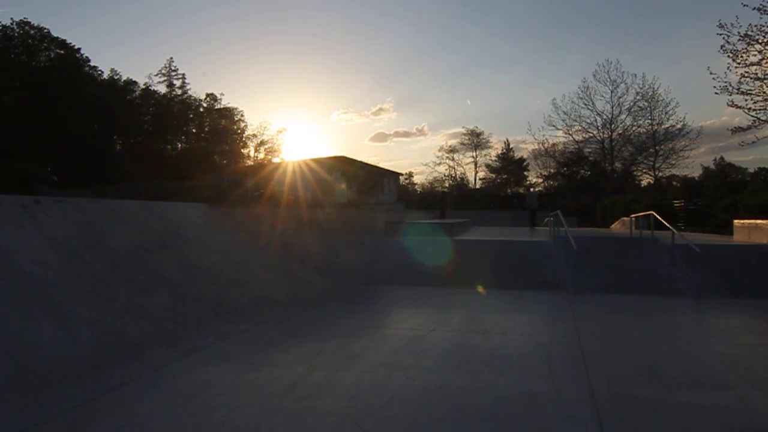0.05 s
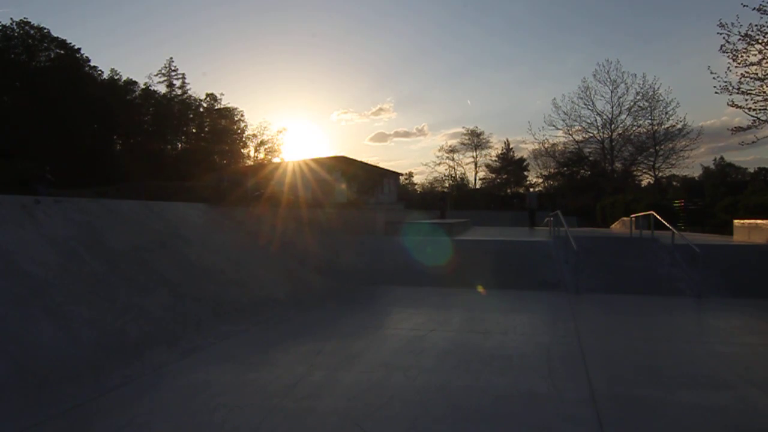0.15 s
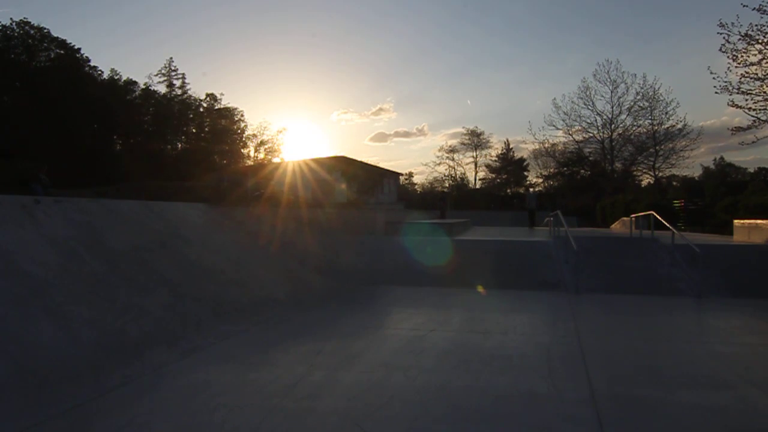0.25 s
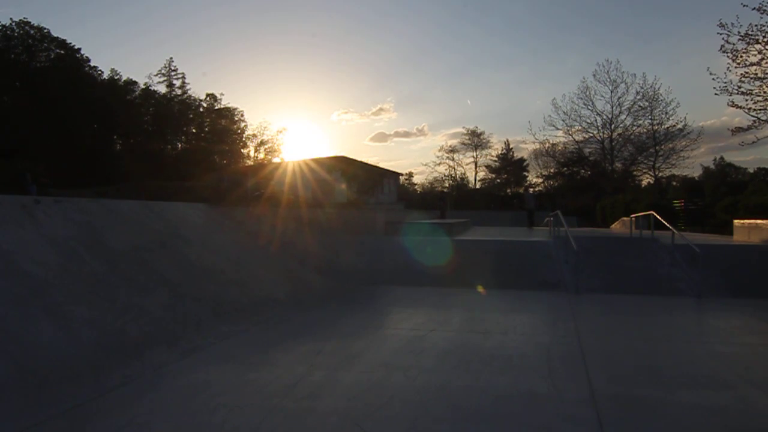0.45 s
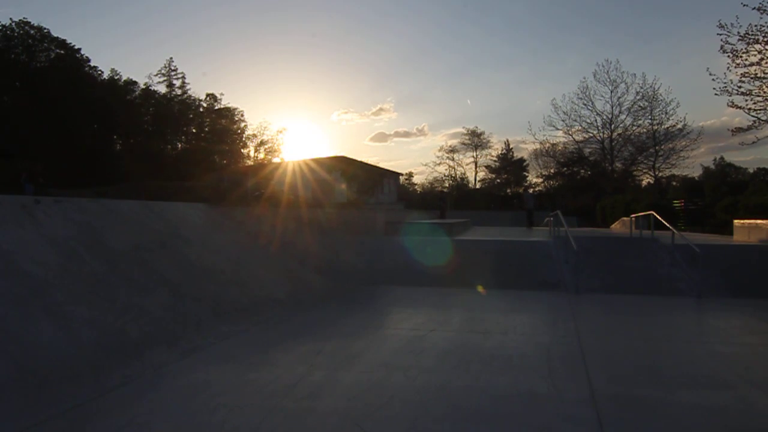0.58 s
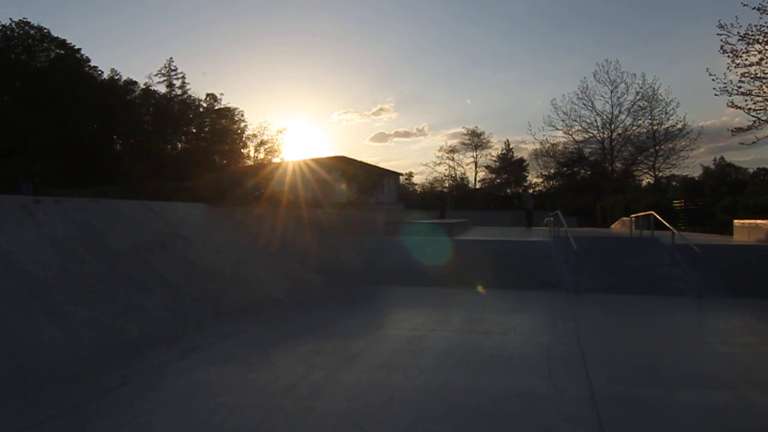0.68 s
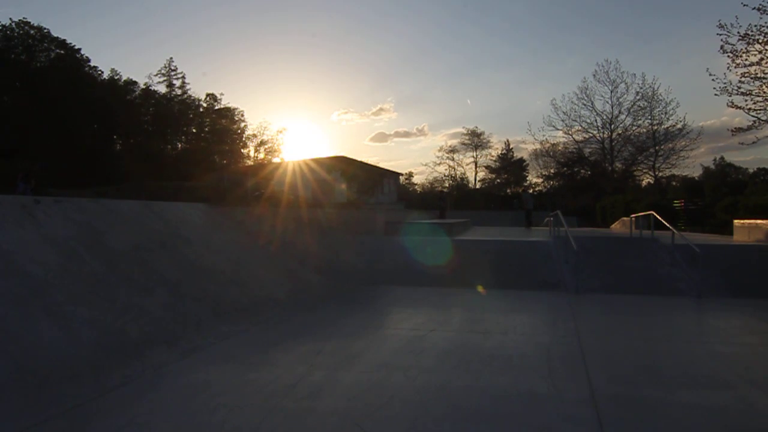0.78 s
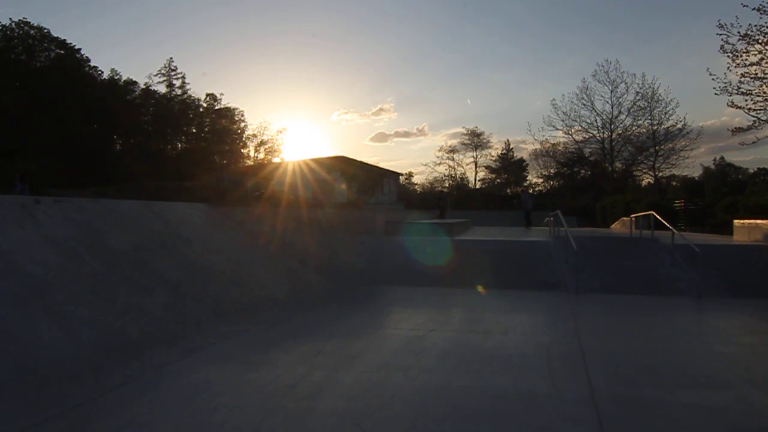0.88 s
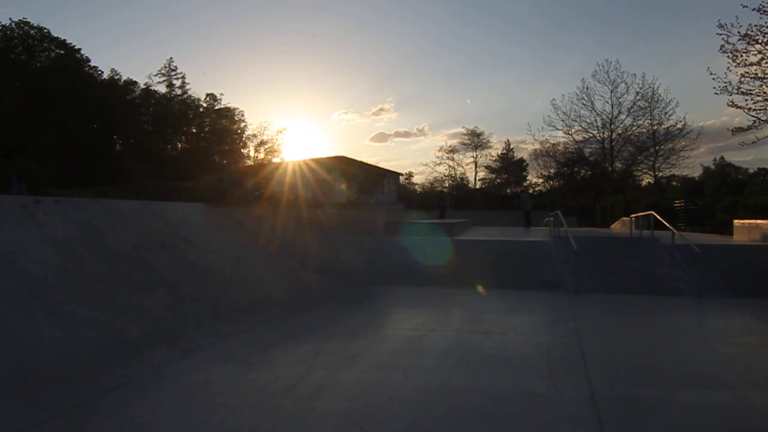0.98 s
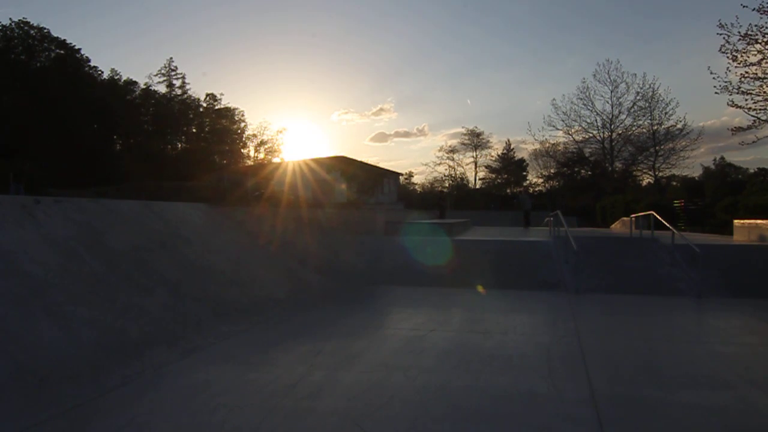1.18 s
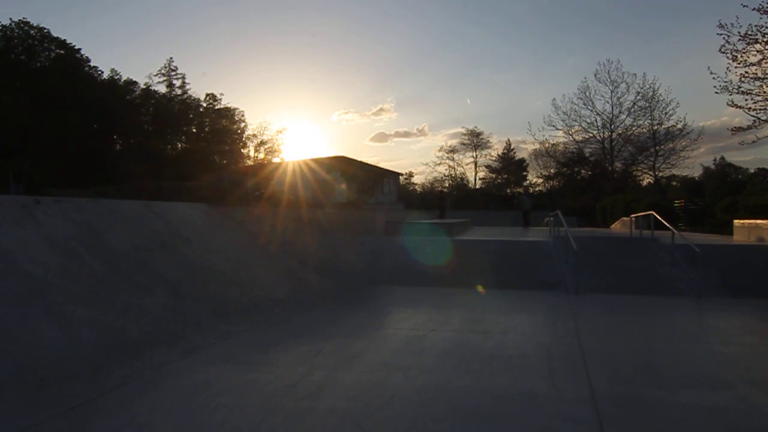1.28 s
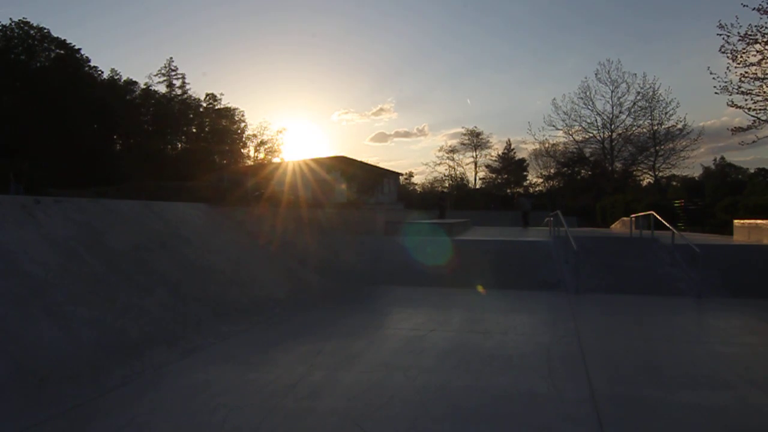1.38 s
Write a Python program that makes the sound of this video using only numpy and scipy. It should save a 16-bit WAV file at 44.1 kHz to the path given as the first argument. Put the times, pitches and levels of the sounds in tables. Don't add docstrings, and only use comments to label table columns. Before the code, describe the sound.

A skateboard lands with a hard clattering crack on concrete, wheels squealing before and after

```python
import sys
import numpy as np
from scipy import signal
from scipy.io import wavfile

SR = 44100
rng = np.random.default_rng(int(sys.argv[2]) if len(sys.argv) > 2 else 0)


def materialize(psi):
    bounded = np.clip(np.atleast_2d(psi).T, -1, 1)
    quanta = np.round(bounded * 32767).astype(np.int16)
    wavfile.write(sys.argv[1], SR, quanta)


def attenuation_scalar(level_db):
    decades = np.asarray(level_db, float) / 20
    return 10 ** decades


N = 63945
TIME = np.arange(N) / SR


def rms_one(x):
    return x / np.sqrt(np.mean(x ** 2) + 1e-20)


def drift(rate_hz):
    r = np.exp(-2 * np.pi * rate_hz / SR)
    settled = signal.lfilter([1], [1, -2 * r, r * r], rng.standard_normal(N + SR))[SR:]
    return rms_one(settled)


def resonate(x, hz, width_hz):
    r = np.exp(-np.pi * width_hz / SR)
    zeros = [(1 - r * r) / 2, 0, (r * r - 1) / 2]
    poles = [1, -2 * r * np.cos(2 * np.pi * hz / SR), r * r]
    return signal.lfilter(zeros, poles, x + 1e-18)


def filtered(x, order, hz, kind="low"):
    return signal.sosfilt(signal.butter(order, hz, kind, fs=SR, output="sos"), x)


def arch(start_s, length_s):
    return np.sin(np.pi * np.clip((TIME - start_s) / length_s, 0, 1))


def banded_noise(spectrum, patchy_db):
    out, together = 0, drift(3)
    edges = 22 * 2 ** np.arange(0, 9.7, 1 / 3)
    white = rng.standard_normal((2, N))
    hz, db = np.transpose(spectrum)
    for k, (low, high) in enumerate(zip(edges, edges[1:])):
        band = filtered(white[k % 2], 2, [low, high], "band")
        level_db = np.interp(np.log(low * high) / 2, np.log(hz), db)
        flicker_db = patchy_db * (.4 * together + drift(11.5))
        out = out + band * attenuation_scalar(level_db + flicker_db)
    return rms_one(out)


# (frequency [Hz], level per Hz [dB])
TRAFFIC_SPECTRUM = [(25, 9.5), (70, -1), (105, -2), (220, -2.5), (420, -6), (1020, -3), (3080, -18.5),
                    (16000, -33.5)]
# (frequency [Hz], width [Hz], level [dB])
TRAFFIC_HUMPS = [(102.3, 18, -41), (158.4, 15, -49), (962, 210, -43), (1584, 194, -46.5)]
# (time [s], level [dB])
TRAFFIC_SWELL = [(0, 1.5), (.15, 0.5), (.28, 0), (.4, 1.8), (.5, 0.3), (.7, -1), (.9, -0.8), (1.1, 0.45),
                 (1.3, -1.5), (1.45, -0.5)]


def traffic():
    humps = 0
    for hz, width_hz, db in TRAFFIC_HUMPS:
        humps = humps + attenuation_scalar(db) * rms_one(resonate(rng.standard_normal(N), hz, width_hz))
    wash = attenuation_scalar(-34.5) * banded_noise(TRAFFIC_SPECTRUM, patchy_db=1.85)
    return attenuation_scalar(np.interp(TIME, *np.transpose(TRAFFIC_SWELL))) * (wash + humps)


def bowl(x):
    tail_db, t60_s, cut_hz, first_return_s = -13, 0.28, 9500, .004
    t = np.arange(SR // 2) / SR
    tail = rng.standard_normal(len(t)) * attenuation_scalar(-60 * t / t60_s) * (t > first_return_s)
    tail = filtered(tail, 1, cut_hz)
    return attenuation_scalar(tail_db) * signal.fftconvolve(x, tail / np.sqrt(np.sum(tail ** 2)))[:N]


def grit():
    grains_per_s, level_db = 110, -3
    born = rng.random(N) < grains_per_s / SR
    dealt = rng.integers(0, 12, N)
    ping = np.hanning(SR // 150)
    out = np.zeros(N)
    for k, hz in enumerate(np.geomspace(4700, 8600, 12)):
        out += np.convolve(born * (dealt == k), ping)[:N] * np.sin(2 * np.pi * hz * TIME)
    return attenuation_scalar(level_db) * out


# (frequency [Hz], level per Hz [dB])
SCRUB_SPECTRUM = [(1500, -8), (3000, -6.5), (4500, 5.5), (6000, 4), (8500, -3), (11500, -3), (15000, -1),
                  (16500, -35)]
# (time [s], level [dB])
SCRUB_LEVEL = [(.26, -72.5), (.31, -45), (.38, -54), (.42, -65), (.45, -78), (.66, -56), (.8, -50),
               (.9, -44), (1.01, -41.5), (1.12, -45.5), (1.2, -46.5), (1.29, -49), (1.33, -62), (1.4, -58),
               (1.45, -58)]


def scrub():
    bounce_s, bounce_share = .0006, .5
    hiss = banded_noise(SCRUB_SPECTRUM, patchy_db=1.2)
    hiss = hiss + bounce_share * np.roll(hiss, int(bounce_s * SR))
    return attenuation_scalar(np.interp(TIME, *np.transpose(SCRUB_LEVEL))) * (hiss + grit())


# (time [s], squeal pitch [Hz], squeal level [dB])
SIDE_LOAD = [
    [(.22, 4045, -48.5), (.29, 4103, -46), (.31, 4075, -43), (.40, 4150, -42), (.44, 4170, -45),
     (.49, 4150, -52), (.5, 4092, -66)],
    [(.72, 4210, -62), (.755, 4275, -46.5), (.82, 4180, -50), (.9, 4060, -39), (.95, 3910, -39),
     (1.05, 3940, -45), (1.09, 3960, -36.5), (1.17, 3830, -43.5), (1.25, 4230, -43), (1.32, 4260, -50),
     (1.38, 4101, -82)],
]


def squeal():
    width_hz, octave_db = 210, -12.5
    s, hz, db = np.transpose(SIDE_LOAD[0] + SIDE_LOAD[1])
    phase = 2 * np.pi * np.cumsum(np.interp(TIME, s, hz)) / SR
    rough = drift(width_hz) * np.cos(phase) + drift(width_hz) * np.sin(phase)
    octave = drift(width_hz) * np.cos(2 * phase) * attenuation_scalar(octave_db)
    level_db = np.interp(TIME, s, db, left=-90) + 1.8 * drift(44)
    return (rough + octave) * attenuation_scalar(level_db)


# (time [s], length [s], pitch [Hz], level [dB])
CHIRP_EVENTS = [(.330, .0044, 4010, -25), (.354, .0064, 4150, -23), (.360, .010, 4080, -23),
                (.370, .007, 4085, -28), (.3775, .0032, 3950, -21), (.383, .0032, 3950, -22),
                (.3865, .0045, 4000, -23), (.396, .010, 4220, -25), (.419, .022, 4180, -32),
                (.472, .02, 4170, -38), (.446, .024, 4220, -39), (.401, .018, 4190, -19),
                (.838, .016, 4040, -36), (.932, .01, 3480, -33), (.924, .014, 3930, -30),
                (.938, .014, 4000, -31), (.996, .012, 3810, -31), (1.069, .016, 3960, -31),
                (1.088, .014, 3950, -33), (1.108, .012, 3070, -31), (.703, .022, 7110, -43),
                (.718, .028, 7410, -45), (1.346, .013, 7260, -43), (1.093, .012, 5850, -41),
                (1.296, .012, 5600, -44), (.325, .012, 8200, -42), (.355, .022, 8250, -40),
                (.392, .012, 8500, -43)]


def chirps():
    wobble_share, flutter_db, overtone_db = .006, 1.0, -37
    out, wobble, flutter = np.zeros(N), drift(158.0), drift(120.0)
    for s, length_s, hz, db in CHIRP_EVENTS:
        phase = 2 * np.pi * hz * np.cumsum(1 + wobble_share * wobble) / SR
        tone = np.sin(phase) + attenuation_scalar(overtone_db) * np.sin(2 * phase)
        out += attenuation_scalar(db + flutter_db * flutter) * arch(s, length_s) * tone
    return out


# (time [s], length [s], pitch [Hz], level [dB])
SLIP_EVENTS = [(.298, .03, 4090, -38), (.375, .02, 3760, -38), (.405, .015, 3510, -42),
               (.75, .07, 4290, -45), (.88, .018, 4130, -35), (.903, .014, 4060, -35),
               (.91, .05, 3490, -41), (.96, .035, 3810, -40), (1.005, .03, 4110, -41),
               (1.078, .04, 3010, -43), (1.11, .03, 3860, -39), (1.145, .05, 3760, -40),
               (1.165, .025, 3460, -42), (.812, .02, 5350, -46), (.84, .035, 5250, -47),
               (.95, .04, 8600, -51), (.99, .05, 5200, -48), (1.0, .04, 6000, -50), (1.105, .03, 7300, -50),
               (1.225, .03, 6050, -49), (.405, .025, 5800, -48)]


def slips():
    width_hz = 170
    a, b = drift(width_hz), drift(width_hz)
    out = np.zeros(N)
    for s, length_s, hz, db in SLIP_EVENTS:
        phase = 2 * np.pi * hz * TIME
        rough = a * np.cos(phase) + b * np.sin(phase)
        out += attenuation_scalar(db) * np.sqrt(arch(s, length_s) + 1e-12) * rough
    return out


# (time [s], length [s], level [dB])
SCRAPE_EVENTS = [
    (.245, .018, -33),
    (.268, .006, -34),
    (.298, .016, -35),
    (.318, .02, -38),
    (.907, .012, -36),
    (.508, .03, -30),
    (.54, .025, -25),
    (.565, .03, -33),
    (.595, .07, -41),
]


def scrapes():
    rasp = rng.standard_normal(N) * attenuation_scalar(2 * drift(250))
    rasp = rms_one(filtered(rasp, 4, [590, 3250], "band"))
    return rasp * sum(attenuation_scalar(db) * np.sqrt(arch(s, length_s) + 1e-12) for s, length_s, db in SCRAPE_EVENTS)


# (time [s], peak level [dB], frequency [Hz], t60 [s])
KNOCK_EVENTS = [(.2450, -15, 1600, .012), (.2537, -12.5, 1835, .009), (.247, -26, 740, .044),
                (.2455, -29, 2700, .018), (.2565, -28, 2900, .02), (.2695, -26, 1780, .015),
                (.285, -23, 1870, .02), (.299, -30, 780, .03), (.3235, -20.5, 1550, .016),
                (.9075, -19, 963, .04), (.908, -30, 2058, .025), (.596, -24, 1220, .026),
                (.917, -29, 330, .1), (1.074, -17, 62, .12), (1.16, -29, 873, .05), (.21, -33, 385, .45),
                (1.0, -35, 153, 3), (.568, -24, 700, .03), (.583, -24, 580, .04)]


def knocks():
    out, noise = np.zeros(N), rng.standard_normal(N)
    for s, db, hz, t60_s in KNOCK_EVENTS:
        age = np.maximum(TIME - s, 0)
        width_hz = 0.76 * hz
        puff = rms_one(resonate(resonate(noise, hz, width_hz), hz, width_hz))
        envelope = attenuation_scalar(db - 60 * age / t60_s) * (1 - np.exp(-2.5 * age * hz))
        out += envelope * (np.sin(2 * np.pi * hz * age) + 0.41 * puff)
    return filtered(out, 2, 3500)


# (time [s], level [dB], contact [s])
THUMP_EVENTS = [(0.509, -18, .002), (0.5226, -20, .002), (.5281, -10.5, .0026), (0.5336, -12.5, 0.0043),
                (0.5397, -14, 0.0022), (.5445, -10, 0.0017), (.5457, -3, 0.0016), (0.5491, -17.5, 0.001),
                (0.5542, -7, 0.0013), (0.56, -17, 0.0023), (0.5674, -15.5, .0015), (0.5698, -27, 0.0019),
                (0.587, -23, 0.0018), (0.907, -20, 0.0029)]
# (frequency [Hz], level [dB], t60 [s])
DECK_MODES = [(145, -18.5, 0.16), (338, -12.5, 0.034), (425, -9.5, 0.029), (554, -25, .02),
              (720, -12, 0.022), (1110, -16, 0.016)]


def thumps():
    rebound_s = .545
    push = np.zeros(N)
    for s, db, contact_s in THUMP_EVENTS:
        push += np.sign(s - rebound_s) * attenuation_scalar(db) * arch(s, contact_s) ** 2
    body = 0
    for hz, db, t60_s in DECK_MODES:
        body = body + attenuation_scalar(db + 7.5) * resonate(push, hz, np.log(1000) / np.pi / t60_s)
    return filtered(0.91 * push + body, 1, 60, "high")


def strikes(rows, rings):
    rise_s, spread_db, treble_dies_faster = .0003, 1.5, 0.11
    out, noise = np.zeros(N), rng.choice([-1., 1.], N)
    spread = rng.standard_normal((len(rows), len(rings)))
    for k, (hz, width_hz, ring_db) in enumerate(rings):
        octaves = np.log2(hz / 4000)
        for (s, db, decay_s, bright_db), own in zip(rows, spread[:, k]):
            i = slice(int(s * SR), int(s * SR) + SR // 10)
            age = TIME[i] - TIME[i][0]
            fall = np.exp(-age / decay_s * (hz / 4000) ** treble_dies_faster)
            burst = noise[i] * (1 - np.exp(-age / rise_s)) * fall
            level_db = db + ring_db + 6.0 + bright_db * octaves + spread_db * own
            out[i] += (-1) ** k * attenuation_scalar(level_db) * resonate(burst, hz, width_hz)
    return out


TICK_UNEVENNESS = [-3, 1, -5, 2, 3, 1, 1, -1]
# (frequency [Hz], width [Hz], level [dB])
LOOSE_PART_RINGS = [(3000, 1200, -8), (4300, 1200, -1), (5800, 1500, 0), (7600, 2000, -5),
                    (9500, 2500, -13), (13000, 3000, -19)]


def rattle():
    first_s, period_s, decay_s = .5641, .01578, .0011
    level_db, loss_db, bright_db, dulling_db = -11, 1.5, 1, .9
    ticks = []
    for k, uneven_db in enumerate(TICK_UNEVENNESS):
        tick_db = level_db - k * loss_db + uneven_db
        ticks.append((first_s + k * period_s, tick_db, decay_s, bright_db - k * dulling_db))
    return filtered(strikes(ticks, LOOSE_PART_RINGS), 2, 2400, "high")


# (time [s], peak level [dB], decay [s], brightness [dB per octave])
CRACK_EVENTS = [(.5043, -44, 0.00052, 1), (.5108, -13, 0.0024, -1), (.5138, -21.5, 0.0021, -7.5),
                (.5207, -22, 0.0022, 7), (.5235, -35, 0.0027, -11), (.5295, -26.5, 0.015, -1),
                (.5400, -2, 0.002, -1), (.5485, -12.5, 0.0013, 3.5), (.5501, -3.5, 0.0013, 0.5),
                (.5545, -21, 0.0017, 6), (.5590, -22, 0.0012, 2), (.5693, -13, 0.0025, -4),
                (.5715, -16, 0.0011, 4), (.576, -20, 0.002, 6), (.5803, -12, .001, -5),
                (.588, -54, .003, 7)]
# (frequency [Hz], width [Hz], level [dB])
DECK_AXLE_RINGS = [(750, 630, -5), (1110, 690, -2), (1460, 770, -2), (2360, 1100, 0), (3050, 940, -5.5),
                   (3750, 560, 2), (5450, 1800, -3), (6980, 1430, -6.5), (9900, 1000, -12.5),
                   (11800, 1100, -8.5), (14900, 1600, -16)]


def cracks():
    return strikes(CRACK_EVENTS, DECK_AXLE_RINGS)


def scene():
    board = cracks() + rattle() + thumps() + knocks()
    wash = traffic() + bowl(board) + scrub() + squeal() + chirps() + slips() + scrapes()
    wash = signal.sosfilt(signal.cheby2(12, 45, 16000, fs=SR, output="sos"), wash)
    return (board + wash)[None]


def band_limit(x):
    return signal.sosfilt(signal.butter(12, 16680, fs=SR, output="sos"), x)


def record(dry):
    duck_s, duck_db, attack_s, release_s, overload = 0.5504, -5.5, 0.013, 0.34, .85
    age = np.maximum(TIME - duck_s, 0)
    recovery = np.clip(1 - age / release_s / 2, 0, 1)
    gain = attenuation_scalar(duck_db * (1 - np.exp(-age / attack_s)) * recovery)
    limited = overload * np.tanh(dry * gain / overload)
    mix = signal.sosfilt(signal.cheby2(10, 50, 16900, fs=SR, output="sos"), limited)
    mix = filtered(mix, 2, 115, "high")
    return band_limit(mix)


dry = scene()
out = record(dry)
materialize(out)
```